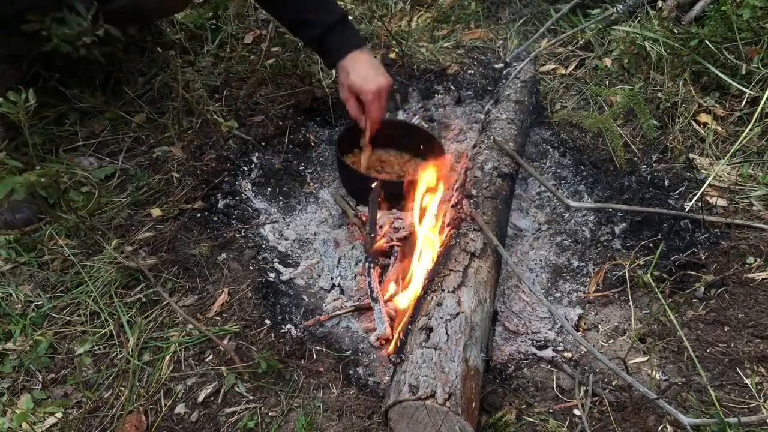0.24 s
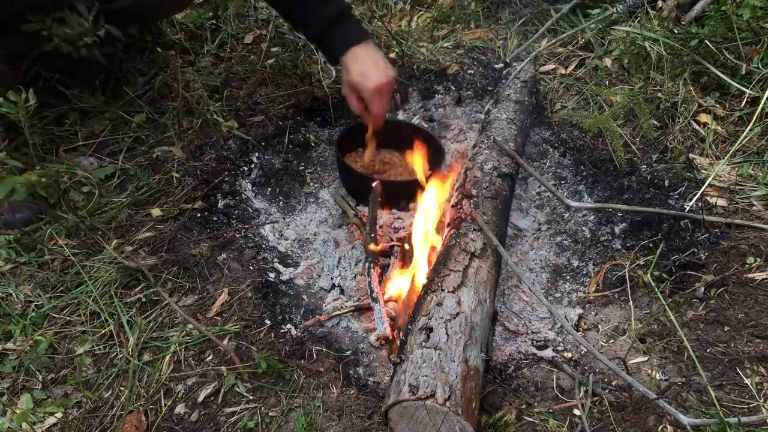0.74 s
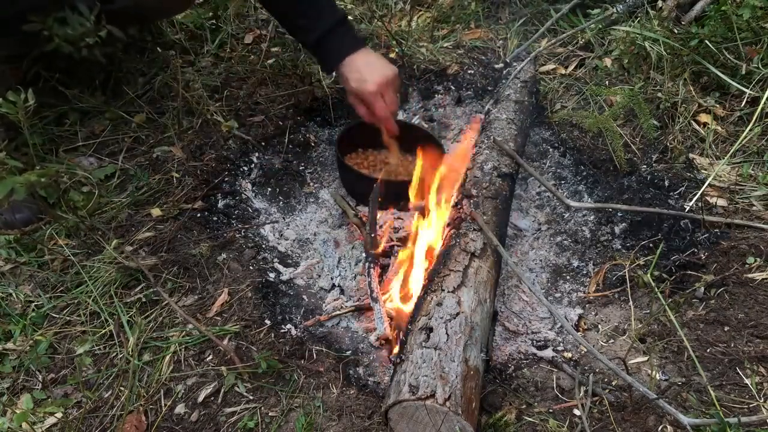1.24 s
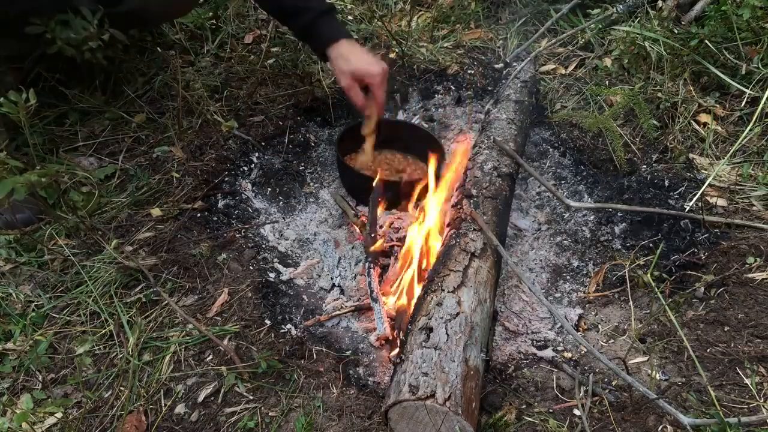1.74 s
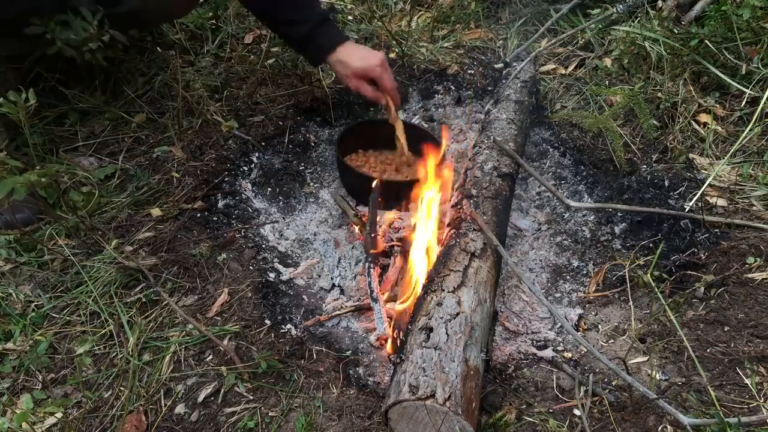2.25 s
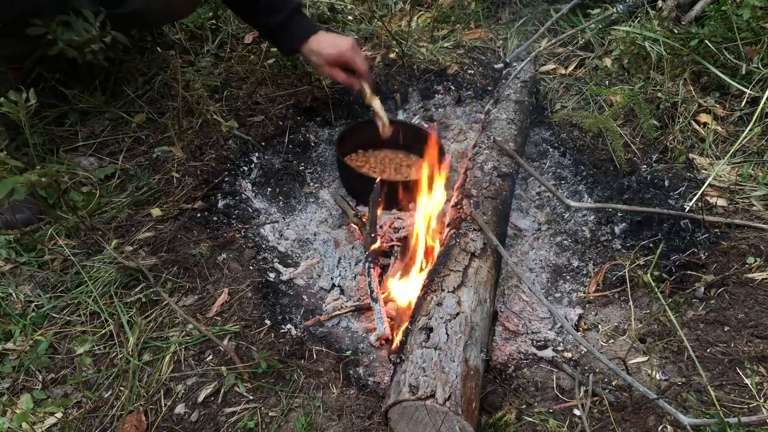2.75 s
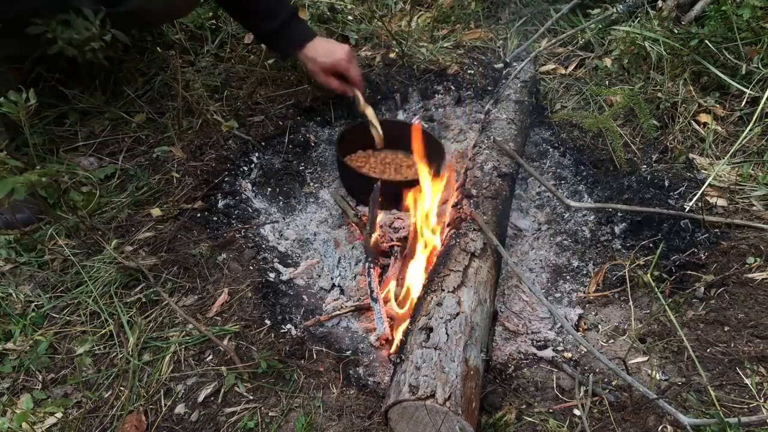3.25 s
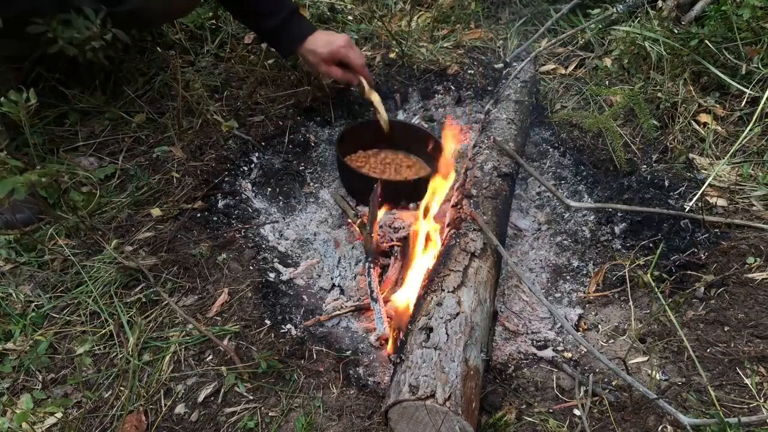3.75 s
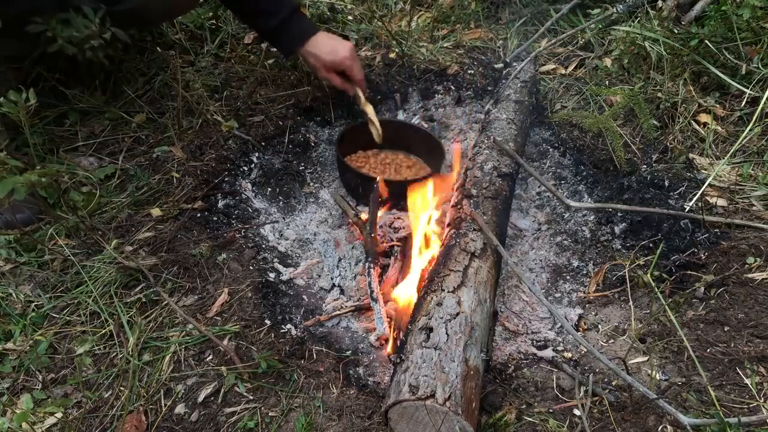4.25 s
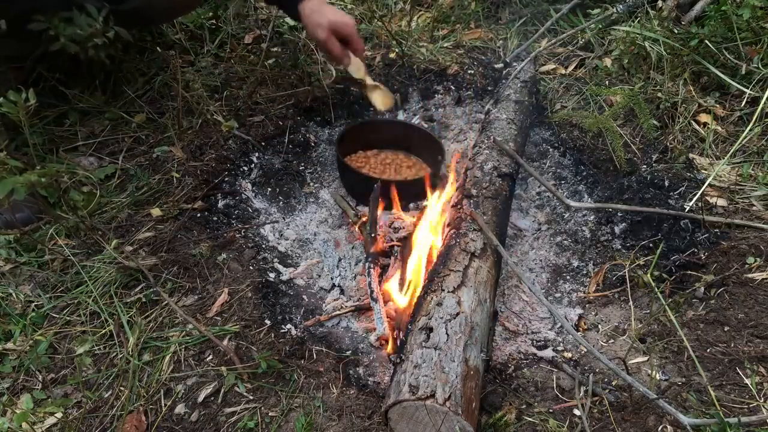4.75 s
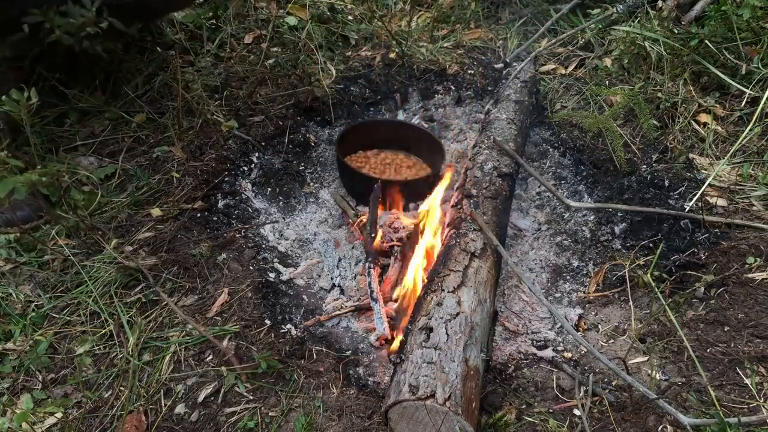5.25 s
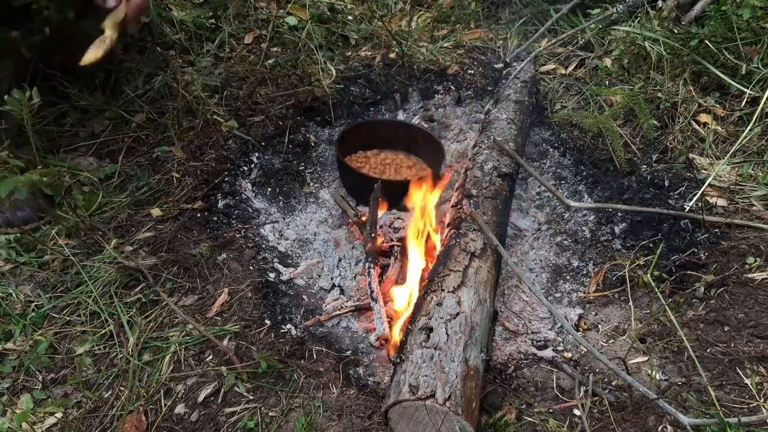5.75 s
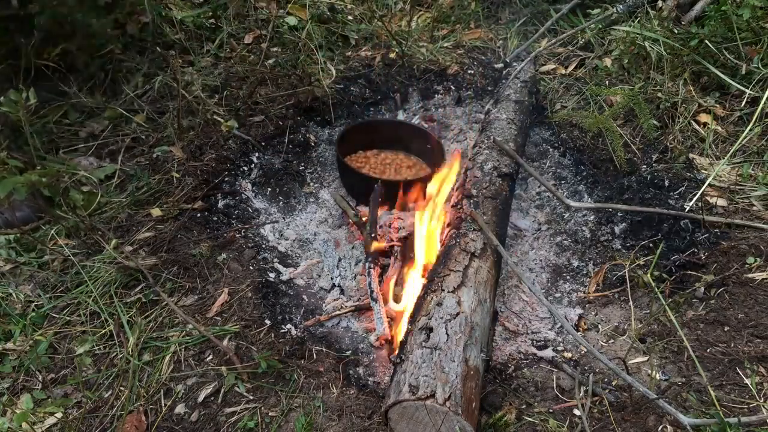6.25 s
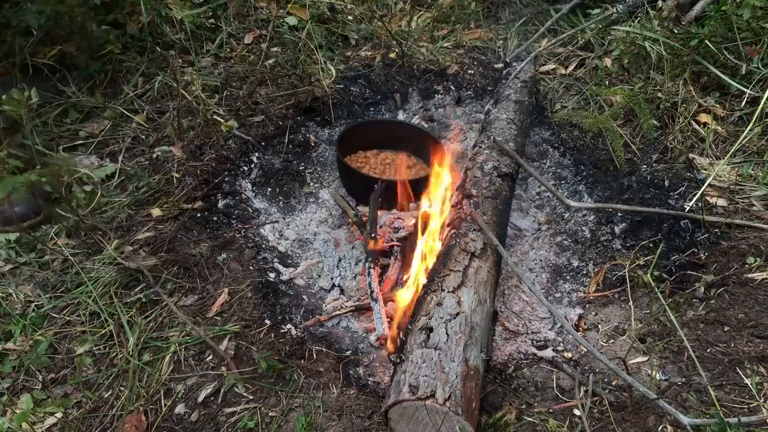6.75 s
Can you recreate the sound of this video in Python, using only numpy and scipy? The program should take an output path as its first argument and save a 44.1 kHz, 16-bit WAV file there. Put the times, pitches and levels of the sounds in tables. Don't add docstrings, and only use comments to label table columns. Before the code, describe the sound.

Campfire hiss and sharp wood cracks, then nine quick, loud spoon knocks on an iron pot, and the fire crackles on alone.

```python
import sys
import numpy as np
from scipy import signal
from scipy.io import wavfile
from scipy.ndimage import uniform_filter1d

SR = 44100
rng = np.random.default_rng(int(sys.argv[2]) if len(sys.argv) > 2 else 0)


def wav_out(sig):
    wavfile.write(sys.argv[1], SR, np.round(np.clip(np.atleast_2d(sig).T, -1, 1) * 32767).astype(np.int16))


def boost(x):
    u = np.asarray(x, float) / 20
    return 10 ** u


N = 308681


def evened(x):
    return x / np.sqrt(np.mean(x ** 2) + 1e-20)


def add(mix, start_s, sound):
    part = mix[round(start_s * SR):][:len(sound)]
    part += sound[:len(part)]


def band(x, lo_hz, hi_hz):
    sos = signal.butter(2, [lo_hz, min(hi_hz, SR / 2.1)], "bandpass", fs=SR, output="sos")
    out = signal.sosfilt(sos, x)
    return out / abs(out).max()


def dying(t, t60):
    return boost(-60 * t / t60)


# first touch [t/s], spoon leaves the rim [t/s], twin modes cancel after [t/s],
# rebound that meets the ring [t/ms]
BLOWS = [
    (2.9062, 2.914, .04, 1.668),
    (3.1036, 3.141, .022, 9.015),
    (3.3133, 3.346, -.015, 4.059),
    (3.5226, 3.558, .035, 8.384),
    (3.7246, 3.756, .015, 9.904),
    (3.9165, 3.957, .04, 11.152),
    (4.1176, 4.150, .034, 2.655),
    (4.3462, 4.377, -.005, 7.79),
    (4.5665, 4.607, .005, 11.757),
]
# knock [level/dB], tick [level/dB], ring [level/dB], place on the rim [degrees],
# rebound share [ratio]
LANDINGS = [(2.5, -0.5, 2.5, 50.5, 1.5), (3, -9, 0.26, 1.5, 0.77), (-0.5, -11, -4.5, -16.5, 0.97),
            (1, -16, -3.5, -25, .98), (1.5, -9.5, 4, 19, 0.39), (3, -5, 0, 18.5, .85),
            (4.5, -2, 1, 39.8, 0.723), (2, -8.5, 5.5, 45, 0.56), (3.5, -17.5, -3, 33, 0.55)]
# touch [t/s], knock [level/dB], tick [level/dB]
BOUNCES = [(2.9088, -4.5, -17), (2.9151, -10.5, -19.5), (3.1062, -7.5, -12.5), (3.1114, -2.5, -25.5),
           (3.1208, -10, -31), (3.1265, -12, -42), (3.1346, -18, -35.5), (3.3159, 1, -13),
           (3.321, -7, -18.5), (3.3293, -12.5, -18), (3.3362, -8, -31.5), (3.5364, -9, -41),
           (3.5466, -11.5, -54), (3.7381, -7.5, -24), (3.927, -6.5, -21.5), (3.9394, -12, -25.5),
           (3.9463, -19.5, -30), (4.1305, 1.5, -8.5), (4.1342, -4, -18), (4.139, -12.5, -18),
           (4.1422, -7, -31.5), (4.3478, -14, -22), (4.3551, -17.5, -18.5), (4.3591, -6, -19.5),
           (4.3687, -3, -11), (4.3773, -10, -24), (4.5771, -7, -37), (4.586, -7, -37.5), (4.5899, -10, -47),
           (4.599, -9.5, -40)]
# [f/Hz], [level/dB], t60 [t/s]
SPOON_MODES = [(345, -28.5, 0.033), (710, -28.5, 0.057), (1135, -27.5, 0.06), (1590, -5.5, 0.062),
               (1820, -1, 0.017), (2223, 6, 0.034), (2890, -2, 0.069), (3317, 5, 0.025), (3620, -8, 0.1),
               (4430, -19, .015), (6000, -27, 0.0257)]


def spoon():
    t, out = np.arange(2600) / SR, np.zeros(N)
    hz, db, t60 = np.transpose(SPOON_MODES)[:, :, None]
    slap = boost(-3.5) * np.sin(2 * np.pi * 2173 * t) * dying(t, 0.005) * np.minimum(t / 0.00036, 1)
    firsts = [(blow[0], *landing[:2]) for blow, landing in zip(BLOWS, LANDINGS)]
    partings = [(blow[1], -18.5, -44.5) for blow in BLOWS]
    for s, knock_db, tick_db in firsts + partings + BOUNCES:
        uneven, detune = rng.standard_normal((2, len(SPOON_MODES), 1))
        phase = 2 * np.pi * hz * (1 + 0.02 * detune) * t
        knock = (boost(db + 3 * uneven) * dying(t, t60) * np.sin(phase)).sum(0)
        rattle, tick = rng.standard_normal((2, len(t)))
        rattle = 0.45 * band(rattle * dying(t, 0.017), 650, 3300)
        scrape = dying(t, 0.025) + 0.032 * dying(t, 0.068)
        tick = band(tick * scrape, 4000, 10500)
        body = 0.76 * band(knock, 120, 7300) + rattle + slap
        add(out, s, boost(knock_db + 2.0) * body + boost(tick_db - 3.0) * tick)
    return out


# [f/Hz], [level/dB], t60 [t/s], sign [+1 or -1]
RIM_MODES = [
    [(190.5, 1, .28, 1), (559.7, 0, .38, 1), (566, -9, .5, -1)],
    [(1091.8, 0, .45, 1), (1098, -5, .09, -1)],
    [(1743.8, 0, .33, 1)],
    [(1751.5, 0, .39, -1)],
    [(2486.7, 0, .23, 1)],
    [(2491.2, 0, .25, -1)],
    [(3266.8, 0, .27, 1)],
    [(3275.7, 0, .09, -1)],
    [(4029.5, 0, .2, 1)],
    [(4738, 0, .14, 1)],
    [(4746.8, 0, .16, -1)],
    [(5393, -2, .15, 1), (5406.7, 0, .1, -1), (6020, -8, .09, 1)],
]
# at a crest [level/dB], turn of the pattern [degrees]
CRESTS = [(-46.5, 80), (-37, 112.9), (-29.5, 160), (-32.5, 134.8), (-30, 43), (-33.5, 154.6), (-20, 168.6),
          (-16, 118), (-17.5, 137.3), (-40.5, 68.8), (-39.5, 34), (-39.5, 18.3)]
RIM_WAVES = [3, 4, 5, 5, 6, 6, 7, 7, 8, 9, 9, 10]


def pot():
    out = np.zeros(N)
    ends = [row[0] for row in BLOWS[1:]] + [BLOWS[-1][0] + 0.54]
    for (s, release, lag, rebound_ms), (_, _, ring_db, place, share), end in zip(BLOWS, LANDINGS, ends):
        t = np.arange(s, end + 0.004, 1 / SR)
        free, ring = t - release, 0
        for modes, waves, (crest_db, turn) in zip(RIM_MODES, RIM_WAVES, CRESTS):
            drive = boost(ring_db + crest_db) * np.hypot(np.cos(np.radians(waves * place + turn)), 0.07)
            for hz, db, t60, sign in modes:
                rebound = abs(1 + share * np.exp(2j * np.pi * hz * rebound_ms / 1000))
                level = sign * drive * rebound * boost(db)
                decay = np.minimum(dying(free, t60), 1 + 10 * t60)
                ring = ring + level * decay * np.sin(2 * np.pi * hz * (free - lag))
        fade = np.minimum((t - s) / 0.00067, (t[-1] - t) / 0.004)
        add(out, s, ring * np.minimum(fade, 1))
    return out


# delay [t/s], [level/dB]
ECHOES = [(.0016, -11), (.0032, -12), (.0046, -19), (.0066, -25)]


def burst(t):
    snap, tail = rng.standard_normal((2, len(t)))
    smear = rng.standard_normal((len(ECHOES), len(t)))
    late = rng.uniform(0.85, 1.15, len(ECHOES))
    tear = np.minimum(t / 0.0001, 1) * np.exp(-(t / 0.0003) ** 2)
    click = np.arange(len(t)) == 6
    snap = 0.6 * snap * tear / np.linalg.norm(snap * tear) + 0.8 * click
    out = snap + tail * (0.018 * dying(t, 0.02) + 0.0005 * dying(t, 0.3))
    for (delay, db), other, factor in zip(ECHOES, smear, late):
        add(out, delay * factor, boost(db) * (0.2 * snap + 0.12 * other * dying(t, 0.006)))
    return out


def coloured(x, points_hz, points_db):
    hz = abs(np.fft.fftfreq(4096, 1 / SR))
    spectrum = np.fft.fft(x, 4096)
    own_db = 10 * np.log10(uniform_filter1d(abs(spectrum) ** 2, size=60, mode="wrap"))
    bass_cut_db = -20 * np.log10(1 + (85 / (hz + 12)) ** 3)
    wanted_db = np.interp(np.log(hz + 1), np.log(points_hz), points_db)
    log_gain = np.log(boost(wanted_db - own_db + bass_cut_db))
    minimum_phase = np.exp(np.conj(signal.hilbert(log_gain)))
    return np.fft.ifft(spectrum * minimum_phase).real * np.hanning(8192)[4096:]


# [t/s], energy [level/dB], boom [level/dB], bite [level/dB],
# treble slope [dB per octave]
CRACKS = [(2.1314, 25.5, -4.5, -11, -6), (2.381, -8, -25, -14.5, 2.5), (2.575, 13, -8, -9, 4.1),
          (2.7972, 15.5, -9, -6, -12.5), (3.2289, 0.5, -4, -13, -8.5), (3.6352, 10, 3, 2.2, -11),
          (4.1199, 16.5, 0.5, -10, 4.5), (4.4498, 19.5, -3.5, -8, -2.5), (5.239, 10, -4, 3.5, -5.5),
          (5.246, 7.5, 1.5, -4.5, 2.5), (5.7893, 23.5, 7.5, -7, 3.5), (5.8008, 10.5, -12, -12.5, -3),
          (6.1892, 16, -3.5, 4.5, -2), (6.298, 15.5, -19.5, -4, 0), (6.4849, 13.5, -2, 2.5, -14.5),
          (6.6071, -12.5, 1.5, -6, 4.5), (6.9596, -.5, 15.5, 12, -0.5)]
# boom, body, bite, two octaves above the bite [f/Hz]
CRACK_HZ = [200, 1400, 3600, 14400]
# [t/s], [level/dB], t60 [t/s]
THUDS = [
    (2.797, -28.5, 0.072),
    (5.25, -27.5, 0.21),
    (6.611, -38.5, 0.044),
    (6.961, -35, 0.094),
]


def cracks():
    t, out = np.arange(3600) / SR, np.zeros(N)
    for s, db, boom_db, bite_db, slope_db in CRACKS:
        colour_db = db + np.array([boom_db, 0, bite_db, bite_db + 2 * slope_db])
        add(out, s, coloured(burst(t), CRACK_HZ, colour_db))
    for s, db, t60 in THUDS:
        add(out, s, boost(db) * band(rng.standard_normal(len(t)) * dying(t, t60), 43, 196))
    return out


# [t/s], energy [level/dB], pitch [f/Hz], fall away from it [dB per octave]
TICKS = [(.212, -28, 13000, 13), (.537, -27.5, 1500, 4), (.5585, -27, 1500, 2.5), (.827, -30, 8000, 8),
         (1.0264, -29, 13000, 8), (1.22, -33.5, 4000, -1), (1.3778, -31, 13000, 7), (1.501, -30, 5000, 2),
         (1.9207, -4, 4040, 39), (2.1093, -26.5, 1490, 10), (2.6412, -20.5, 8090, 7),
         (2.8519, -29, 4000, 6), (3.0792, -18, 1500, 6), (3.892, -15, 2792, 21), (4.0862, -19, 3976, 12),
         (5.288, -14.5, 1510, 12), (5.331, -22, 9100, 22), (5.4196, -16, 3530, 23),
         (5.4703, -11, 1700, 11.5), (5.628, -28.5, 12800, 0), (5.642, -19, 11500, 7),
         (5.6727, -17.5, 6040, 14.5), (5.736, -17.5, 11550, 21), (5.782, -17, 1600, 3.5),
         (6.545, -21, 2200, 8), (6.57, -26, 6000, 9), (6.81, -20, 4984, 10), (6.827, -25, 11960, 5),
         (6.8514, -18.5, 14000, 22), (6.9367, -23, 4030, 0)]


def embers():
    t, out, hz = np.arange(900) / SR, np.zeros(N), np.geomspace(1200, 14000, num=36)
    sparks_per_s, spark_db, spark_fall_db = 5, -37, 13
    when, pitch, size = rng.random((40, 3))[:round(sparks_per_s * N / SR)].T
    spark_hz = 13500 / 9 ** pitch ** 2
    sparks = zip(when * (N / SR - 0.1), spark_db + 6 * size, spark_hz, spark_fall_db + 0 * size)
    overtone, overtone_db = 1.79, -4
    for s, db, pitch_hz, fall_db in TICKS + list(sparks):
        first, second = -fall_db * abs(np.log2(hz / pitch_hz / [[1], [overtone]]))
        peaks_db = db + np.maximum(first, second + overtone_db)
        add(out, s, coloured(burst(t), [500, *hz], [-50, *peaks_db]))
    return out


# [t/s], length [t/s], peak
# [level/dB], centre [f/Hz]
RUSTLES = [(2.138, 0.11, -46.5, 5160), (4.118, 0.06, -34, 9000), (2.1311, 0.0033, -4, 5180),
           (2.5746, 0.0017, -9.5, 6600), (5.789, 0.0024, -6.5, 6200), (5.4, 0.034, -65, 4000),
           (5.792, 0.11, -46, 5100), (6.153, 0.036, -42.5, 3000), (6.312, 0.11, -50, 935),
           (6.45, 0.039, -42, 1005), (6.793, 0.033, -40, 4060), (6.937, .03, -42, 2950)]


def rustles():
    out = np.zeros(N)
    swishes = [(s - 0.024, 0.024, -47, 2400) for s, *_ in BLOWS]
    for s, length, db, hz in RUSTLES + swishes:
        grains = rng.standard_normal((2, 6000)).prod(0)[:round(length * SR)]
        swell = signal.windows.tukey(len(grains), 0.5)
        add(out, s, boost(db) * band(grains * swell, hz / 2.0, hz * 1.6))
    return out


# [f/Hz], [level/dB per Hz]
FLAMES = [(20, -38.5), (45, -13), (70, -2), (95, -7.5), (140, -11), (200, -15), (300, -14.5), (500, -20),
          (1000, -20.5), (2500, -23), (5000, -27.5), (9200, -29.5), (10500, -35), (12000, -30.5)]
# [t/s], [level/dB]
FLARE = [(0, -2.5), (.49, -3), (1.19, -3.4), (1.4, -2.1), (1.86, -3.5), (2.2, -1.1), (2.59, -3.2),
         (2.849, 1.5), (4.8, -1.6), (5.17, -2.2), (5.41, 1.5), (5.55, -0.5), (6.13, 1), (6.34, 9),
         (6.45, 3.5), (6.6, 1.5), (6.85, 2.5), (7, 9)]
FLARE_SHARES = [.6, 0.97, 1.3]
SWELL_HZ = [256.9, 1805, 9100]


def flames():
    frames, hz = N // 128 + 5, np.fft.rfftfreq(512, 1 / SR)
    log_hz = np.log(hz + 1)
    a, b, patches = rng.standard_normal((frames, 257, 3)).T
    noise = a + 1j * b
    patches = uniform_filter1d(patches, size=8, axis=0)
    patches = evened(uniform_filter1d(patches, size=16, axis=1))
    flicker = evened(uniform_filter1d(rng.standard_normal(frames), size=4))
    flare_db = np.interp(np.arange(frames) * 128 / SR, *np.transpose(FLARE))
    swells_db = np.outer(FLARE_SHARES, flare_db)
    shares = np.array([np.interp(log_hz, np.log(SWELL_HZ), row) for row in np.eye(3)])
    f, db = np.transpose(FLAMES)
    field_db = np.interp(log_hz, np.log(f), db)[:, None] + 1.9 * patches + 0.84 * flicker
    still = signal.istft(noise * boost(field_db), nperseg=512, noverlap=384)[1]
    moving = signal.istft(noise * boost(field_db + shares.T @ swells_db), nperseg=512, noverlap=384)[1]
    moving = signal.sosfilt(signal.butter(4, 55, "highpass", fs=SR, output="sos"), moving)
    return boost(-58) * moving[:N] / still.std()


# [t/s], firing rate [f/Hz], second order [level/dB], third order [level/dB]
ENGINE = [(0, 46.32, -65.5, -68.5), (1, 46.03, -61, -63), (2, 46.2, -63.5, -66),
          (2.699, 45.3, -57.5, -57.5), (3.7, 46.15, -61, -59), (4.799, 45.2, -72, -58),
          (5.5, 44.47, -65, -58.5), (6.2, 46.15, -70, -54), (7, 45.44, -79, -58.5)]


def engine():
    s, *columns = np.transpose(ENGINE)
    hz, second_db, third_db = (np.interp(np.arange(N) / SR, s, c) for c in columns)
    turn = 2 * np.pi * np.cumsum(hz) / SR
    waver = rng.standard_normal((N // 2000 + 2, 4))
    waver = [np.interp(np.arange(N) / 2000, np.arange(len(waver)), w) for w in waver.T]
    levels_db = {2: second_db, 3: third_db, 4: third_db - 19.0, 6: third_db - 14.5}
    out = np.zeros(N)
    for (order, db), w in zip(levels_db.items(), waver):
        out += np.sqrt(2) * boost(db + 1.1 * w) * np.sin(order * turn + 0.19 * w[::-1])
    return out


# start [t/s], pulse rate [f/Hz], peak [level/dB]
CROAKS = [
    (.778, 28.7, -54),
    (1.22, 22.3, -57.5),
]


def bird():
    t, out = np.arange(900) / SR, np.zeros(N)
    croak_hz, swell_db = 1030, 6
    pulse = np.sin(2 * np.pi * croak_hz * t) * np.minimum(t / 0.0024, 1) * dying(t, 0.056)
    for start, rate, db in CROAKS:
        for k in range(5):
            level = boost(db + 2.5 - swell_db * (1 - k / 4) ** 2)
            add(out, start + k / rate, level * pulse)
            add(out, start + k / rate + 0.012, boost(-10.0) * level * pulse)
    return out


def scene():
    front = spoon() + pot()
    fire = cracks() + embers() + rustles() + flames()
    return (front + fire + engine() + bird())[None]


def band_limit(x):
    return signal.sosfilt(signal.butter(12, 16870, fs=SR, output="sos"), x)


def record(dry):
    overloaded = np.clip(dry, -1, 1)
    top_cut = signal.firwin(101, 15850, fs=SR)[None]
    mix = signal.oaconvolve(overloaded, top_cut, "same")
    return band_limit(mix)


dry = scene()
out = record(dry)
wav_out(out)
```